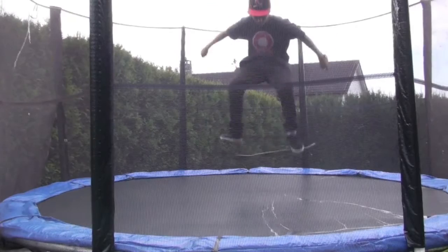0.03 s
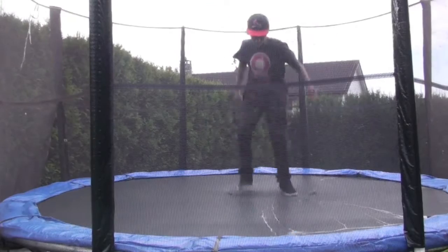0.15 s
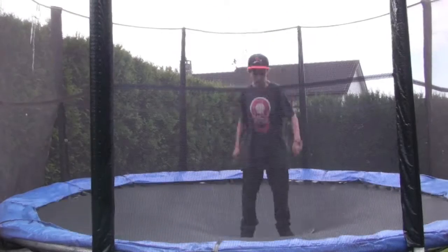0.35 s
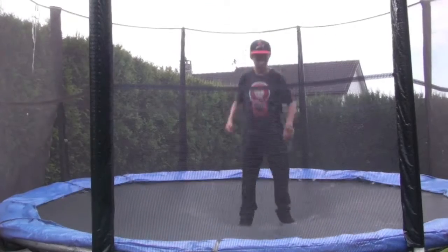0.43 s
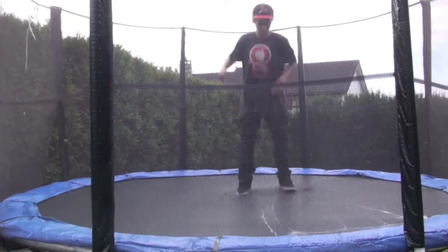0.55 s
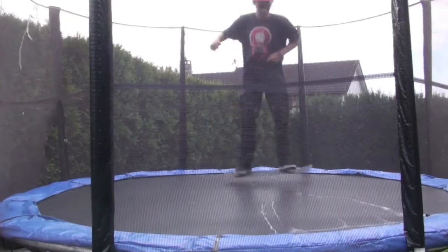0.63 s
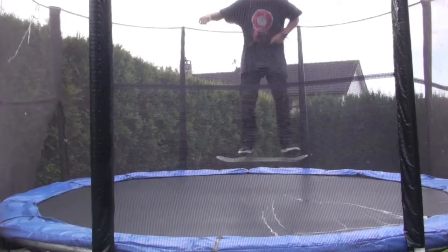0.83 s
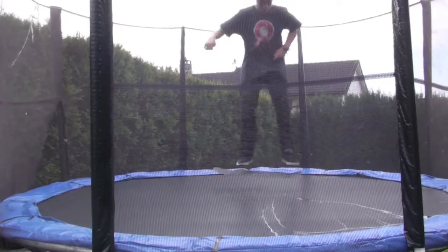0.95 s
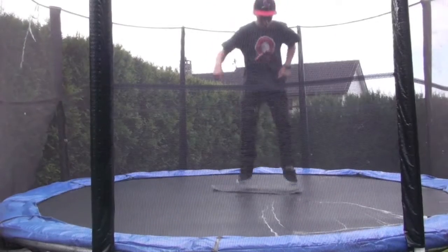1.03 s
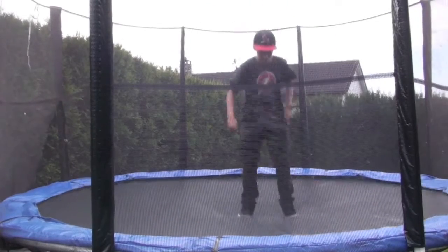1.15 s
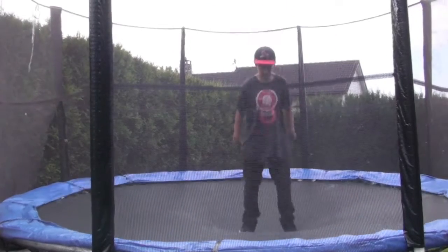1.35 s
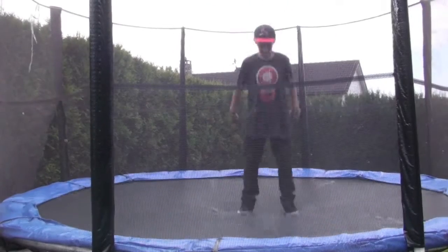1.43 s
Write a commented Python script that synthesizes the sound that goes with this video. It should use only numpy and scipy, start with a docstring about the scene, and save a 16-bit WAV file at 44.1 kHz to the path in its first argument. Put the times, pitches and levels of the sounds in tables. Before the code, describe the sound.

Two trampoline bounces with a skateboard deck underfoot. Shoes tap the board, then it lands with a scuff and clacks as the mat thumps and springs creak and ring. Fabric swishes before the second landing, close by in light wind.

```python
"""A rider bounces twice on a garden trampoline with a wheelless skateboard deck under the shoes.
Light wind runs throughout; at the start the springs creak and the mat thumps softly. At 0.24 s the feet
tap the deck in the air and it rings. At about 0.35 s the first landing scuffs, knocks and clacks, with a
short echo off hedge and house; the mat thumps, the springs creak and ring as they stretch, and the
fabric swishes on the rebound. The second landing comes at about 1.25 s."""
import sys
import numpy as np
from scipy import signal
from scipy.fft import rfft, irfft
from scipy.io import wavfile
from scipy.ndimage import uniform_filter1d

SR = 44100
rng = np.random.default_rng(int(sys.argv[2]) if len(sys.argv) > 2 else 0)


def wav_record(signal):
    """Record a signal, one row per channel, as 16-bit PCM in the file named by sys.argv[1]."""
    frames = np.transpose(np.atleast_2d(signal))
    bounded = np.clip(frames, -1, 1)
    # unit amplitude maps onto the largest positive 16-bit level
    quanta = np.round(bounded * 32767).astype(np.int16)
    wavfile.write(sys.argv[1], SR, quanta)


N = 66150
T = np.arange(N) / SR
BIN_HZ = np.arange(N // 2 + 1) * SR / N


def from_db(db):
    """Decibels to gain."""
    return 10 ** (np.asarray(db) / 20)


def rms_one(x):
    """Scale to rms 1."""
    return x / np.sqrt(np.mean(x ** 2) + 1e-20)


def per_bin(curve):
    """Spread a curve over the spectrum on a log-frequency axis."""
    hz, values = np.transpose(curve)
    return np.interp(np.log(BIN_HZ + 1), np.log(hz), values)


def filtered(x, hz, kind, order=2):
    """Causal Butterworth filter."""
    edges_hz = np.sort(np.clip(hz, 10, .45 * SR), axis=None).squeeze()
    return signal.sosfilt(signal.butter(order, edges_hz, kind, fs=SR, output="sos"), x + 1e-18)


def ring(start_s, hz, t60_s):
    """A struck sine that dies away."""
    age_s = np.maximum(T - start_s, 0)
    return np.sin(2 * np.pi * hz * age_s) * np.exp(-np.log(1000) * age_s / t60_s)


def envelope(start_s, attack_s, hold_s, t60_s):
    """Linear attack, hold, exponential release."""
    release_s = np.maximum(T - start_s - attack_s - hold_s, 0)
    return np.clip((T - start_s) / attack_s, 0, 1) * np.exp(-np.log(1000) * release_s / t60_s)


def white():
    """Two unrelated white noises."""
    return rng.standard_normal((2, N))


def grains(per_s, spread_db):
    """Two streams of random stick-slip clicks of uneven size."""
    sizes = from_db(spread_db * np.minimum(rng.exponential(1, (2, N)), 4))
    return (rng.random((2, N)) < per_s / SR) * sizes * rng.choice([-1, 1], (2, N))


def levelled(x, samples):
    """Ride the gain of a noise to hold it steady."""
    power = np.mean(np.atleast_2d(x) ** 2, axis=0)
    return x / np.sqrt(uniform_filter1d(power, samples) + 1e-12)


# Narrow image of close sounds: frequency_hz, left_right_correlation
CLOSE_IMAGE = [(40, 1), (200, 1), (500, 0.97), (1100, 0.72), (2200, 0.77), (4500, 0.94), (8000, 0.77),
               (13000, 0.96)]
def stereo(pair, eq, image=CLOSE_IMAGE):
    """EQ two unrelated signals and use them as mid and side; rms 1."""
    mid, side = rfft(pair) * from_db(per_bin(eq))
    alike = np.clip(per_bin(image), -1, 1)
    return rms_one(irfft(np.sqrt(1 + alike) * mid + np.sqrt(1 - alike) * side * [[1], [-1]], N))


# Full pan, added right and taken from left: frequency_hz, gain_db
PAN_CURVE = [(100, 0.9), (400, 1.14), (1150, 3), (2400, 1), (8000, 1.5), (13000, 2.5)]
SPRINGS_PAN = 0.28
def pan_right(x, amount=1):
    """Lean a source to the right, most in the midrange."""
    lean_db = amount * per_bin(PAN_CURVE)
    return irfft(rfft(x) * from_db(lean_db * np.array([[-1], [1]])), N)


# Bass-heavy air: frequency_hz, gain_db
WIND_EQ = [(25, -43), (60, -1.5), (110, -6.5), (250, -11), (600, -12), (1300, -15), (2500, -22),
           (6000, -26.5), (11000, -30.5), (16000, -36.5)]
# Its diffuse image: frequency_hz, left_right_correlation
WIND_IMAGE = [(80, 1), (400, 0.53), (2400, 0.11), (8000, 0.35), (13000, 0.98)]
def wind(level_db=-53.5, flutter_db=1.5):
    """A bed of light, slightly fluttering wind."""
    flutter = rms_one(filtered(rng.standard_normal(N), 5.9, "low"))
    return from_db(level_db + flutter_db * flutter) * stereo(white(), WIND_EQ, WIND_IMAGE)


# Creak fader, tracing the load on the springs: time_s, level_db
CREAK_FADER = [(0, -43), (.012, -46), (.04, -59), (.09, -72), (.23, -58), (.26, -47), (.32, -55),
               (.36, -31), (.41, -36), (.488, -43.5), (.497, -34.5), (.518, -37.5), (.545, -32.5),
               (.575, -35), (.595, -42), (.66, -49.5), (.74, -50), (.78, -47), (.82, -56), (.94, -53.5),
               (.98, -47.5), (1.005, -55.5), (1.08, -65.5), (1.21, -63.5), (1.27, -45.5), (1.305, -36),
               (1.34, -41), (1.39, -48), (1.412, -36.5), (1.44, -45), (1.47, -41.5), (1.5, -41.5)]
# Creak colour, with a soft top: frequency_hz, gain_db
CREAK_EQ = [(60, 2), (200, -1.5), (700, -0.5), (1300, -0.5), (2400, -1.5), (4000, -8.5), (7000, -14),
            (11000, -25), (16000, -38)]
def spring_creak():
    """Hooks stick and slip in their rings under load."""
    friction = levelled(stereo(grains(per_s=5000, spread_db=2.5), CREAK_EQ), samples=1200)
    level_db = np.interp(T, *np.transpose(CREAK_FADER))
    return pan_right(friction * from_db(level_db), SPRINGS_PAN)


# The mat takes a load: start_s, level_db, attack_s, t60_s, low_cut_hz, high_cut_hz
THUMP_CUES = [(.002, -39.5, 0.0031, 0.13, 89.5, 365), (.240, -43, 0.0037, 0.26, 71.5, 246),
              (0.322, -34.5, 0.002, 0.17, 60.5, 216), (0.351, -24.5, .002, 0.16, 90, 221),
              (0.373, -33, 0.0088, 0.44, 38, 148), (0.523, -34, 0.0121, 0.3, 85, 347),
              (0.599, -49.5, .02, .25, 35, 110), (0.951, -44, .016, 0.14, 85, 253),
              (1.224, -48, 0.0028, 0.25, 50, 310), (1.277, -37.5, 0.0072, 0.15, 116, 210),
              (1.405, -43.5, 0.0049, 0.13, 38.8, 128), (1.444, -43.5, 0.0053, 0.33, 56, 157)]
def mat_thumps(swing_gain=1.5, swing_t60_cycles=7.2):
    """The stretched mat answers each load with a damped swing and a rumble of crowded low modes."""
    out = np.zeros(N)
    for start_s, level_db, attack_s, t60_s, low_hz, high_hz in THUMP_CUES:
        rumble = filtered(rng.standard_normal(2 * N), [low_hz, high_hz], "band", order=3)[N:]
        rumble = levelled(rumble, samples=500) * envelope(start_s, attack_s, 0, t60_s)
        pitch_hz = np.sqrt(low_hz * high_hz)
        swing = ring(start_s + attack_s, pitch_hz, swing_t60_cycles / pitch_hz)
        out += from_db(level_db) * (rumble + swing_gain * filtered(swing, high_hz, "low", order=1))
    return pan_right(out, amount=0.46)


# Soles and deck scuff: start_s, level_db, attack_s, hold_s, t60_s, brightness_hz
SCUFF_CUES = [(0.236, -33.5, 0.00044, 0.0023, 0.12, 5150), (0.349, -26, 0.0022, 0.0053, 0.05, 4880),
              (0.357, -28, 0.00087, 0.017, 0.037, 8200), (0.38, -22, 0.00091, 0.01, 0.052, 3730),
              (0.953, -40.5, 0.013, 0.023, 0.045, 1610), (1.226, -45.5, 0.0017, 0.025, 0.055, 6030),
              (1.254, -25, 0.006, 0.026, .04, 3000), (1.274, -22, 0.0055, 0.0074, 0.067, 4480)]
# Grit colour: frequency_hz, gain_db
SCUFF_EQ = [(60, -30), (160, -5.5), (480, 1.5), (1250, -2.5), (2150, 1.5), (3300, -3.5), (6000, -4.5),
            (10000, -5.5)]
def scuffs():
    """Short gritty slides of sole on grip tape and deck on mat."""
    grit = levelled(stereo(grains(per_s=9000, spread_db=3.5), SCUFF_EQ), samples=250)
    out = np.zeros((2, N))
    for start_s, level_db, attack_s, hold_s, t60_s, brightness_hz in SCUFF_CUES:
        slide = grit * envelope(start_s, attack_s, hold_s, t60_s)
        out += from_db(level_db) * filtered(slide, brightness_hz, "low", order=3)
    return out


# Shoes hit the deck: start_s, level_db, low_cut_hz, brightness_hz, pitch_ratio, decay_ratio
KNOCK_CUES = [(0.2365, -23.5, 480, 5470, 1.0, 0.62), (0.2399, -22.5, 127, 2170, 1.06, 1.25),
              (0.3544, -8.7, 190, 640, .99, 1.24), (.3788, -17, 102, 2520, .98, 0.41),
              (1.2569, -11, 746, 1060, 1.044, 0.8), (1.2802, -20, 249, 2600, 0.95, 0.94),
              (1.285, -23, 203, 900, 1.15, 0.75)]
# The deck's resonances, before each hit scales them: pitch_hz, level_db, t60_s
DECK_MODES = [(133.6, -17, 0.17), (364, -3, 0.032), (481, -1.5, 0.05), (480, -17, 0.14), (614.5, -28, 0.35),
              (900, -5.5, 0.022), (1278, -6, 0.04), (1740, -3, 0.015), (1666, -21.5, 0.23),
              (2170, -19, 0.1), (2440, -14, 0.042), (2780, -5.5, 0.012), (4150, -4, 0.0086),
              (5120, -3.5, 0.012), (6560, -19, 0.02)]
def deck_knocks():
    """Each hit rings the deck's modes, retuned by the load and duller for a soft contact."""
    out = np.zeros(N)
    for start_s, level_db, low_hz, brightness_hz, pitch_ratio, decay_ratio in KNOCK_CUES:
        body = np.zeros(N)
        for k, (pitch_hz, mode_db, t60_s) in enumerate(DECK_MODES):
            gain = (-1) ** k * from_db(mode_db + rng.normal(0, 1))
            body += gain * ring(start_s, pitch_hz * pitch_ratio, t60_s * decay_ratio)
        body = filtered(body, brightness_hz, "low", order=3)
        out += from_db(level_db) * filtered(body, low_hz, "high")
    return out


# Hard edges hit: start_s, level_db, low_cut_hz, high_cut_hz
CLACK_CUES = [(0.238, -9, 3100, 6400), (0.242, -19, 810, 6230), (.3553, -0.5, 1470, 8300),
              (0.3714, 0, 1170, 7600), (.3792, 0.5, 900, 4030), (0.3957, 5.5, 1780, 3750),
              (1.276, -6.5, 2000, 6100), (1.2858, 11, 1990, 2400), (1.2968, 14, 1800, 3630)]
def edge_clacks(tail_db=-30, tail_t60_s=0.02):
    """Hard edges strike with a sharp click and a brief splintery tail."""
    out = np.zeros(N)
    for start_s, level_db, low_hz, high_hz in CLACK_CUES:
        click = signal.unit_impulse(N, int(start_s * SR))
        tail = from_db(tail_db) * rng.standard_normal(N) * envelope(start_s, 1 / SR, 0, tail_t60_s)
        out += from_db(level_db) * filtered(click + tail, [low_hz, high_hz], "band", order=4)
    return out


def garden_echo(x, level_db=-26, predelay_s=0.012, t60_s=0.49, band_hz=(94, 3200)):
    """Dull scattered reflections off hedge and house, different at each ear."""
    tail = filtered(white(), band_hz, "band") * envelope(predelay_s, 0.0059, 0, t60_s)
    return from_db(level_db) * signal.fftconvolve(x, rms_one(tail) / np.sqrt(N), axes=1)[:, :N]


# Fabric moves: start_s, level_db, attack_s, t60_s
SWISH_CUES = [(0.322, -38, 0.0025, 0.018), (.332, -44.5, 0.011, 0.12), (0.402, -37.5, 0.015, 0.39),
              (.455, -43, 0.0084, 0.073), (0.493, -38.5, 0.0089, 0.22), (.60, -55.5, 0.078, 0.7),
              (0.743, -45.5, 0.048, 0.12), (0.83, -40, 0.0067, 0.16), (0.891, -37, 0.0062, 0.14),
              (1.22, -52, .003, 1), (1.396, -52.5, 0.0045, 0.099)]
# Airy cloth colour: frequency_hz, gain_db
SWISH_EQ = [(300, -28), (1200, -7.5), (2500, 6.5), (3700, 3), (5500, 6), (8400, 4), (10300, -2.5),
            (12400, -1), (13800, -13), (16000, -8.5)]
def fabric_swishes():
    """Woven mat and net rub in soft bright swishes."""
    fader = sum(from_db(level_db) * envelope(start_s, attack_s, 0, t60_s)
                for start_s, level_db, attack_s, t60_s in SWISH_CUES)
    return stereo(white(), SWISH_EQ) * fader


# Jolts to springs and frame: start_s, level_db, centre_hz, spread_octaves
JOLT_CUES = [(0.357, -44, 1980, 0.21), (.493, -31, 1650, 0.15), (1.282, -30, 2130, 0.47),
             (1.36, -47.5, 2340, .38), (1.403, -39, 1083, 0.45)]
# Their steel resonances: pitch_hz, level_db, t60_s
STEEL_MODES = [(512, 11, 1), (862, 1, 0.44), (1323, 10, 0.16), (1660, 5.5, 0.23), (2000, 6, 0.14),
               (2098, 17, 0.089), (2450, -9, 0.47), (2910, -2, 0.32), (3560, 8, 0.14)]
def spring_ring(springs_per_jolt=3, detune=0.0066, attack_s=0.0046, scatter_db=4.2):
    """Each jolt sets a few springs ringing, no two tuned quite alike."""
    out = np.zeros((2, N))
    for start_s, level_db, centre_hz, spread_octaves in JOLT_CUES:
        fade_in = np.clip((T - start_s) / attack_s, 0, 1)
        for pitch_hz, mode_db, t60_s in STEEL_MODES:
            excitation = np.exp(-.5 * (np.log2(pitch_hz / centre_hz) / spread_octaves) ** 2)
            springs = [rng.choice([-1, 1]) * ring(start_s, pitch_hz * rng.normal(1, detune), t60_s)
                       for _ in range(springs_per_jolt)]
            ear_gains = from_db(level_db + mode_db + rng.normal(0, scatter_db, (2, 1)))
            out += excitation * ear_gains * np.mean(springs, axis=0) * fade_in
    return pan_right(out, SPRINGS_PAN)


def scene():
    """The deck and its echo, mixed over mat, springs, fabric and wind."""
    deck = pan_right(deck_knocks() + edge_clacks() + scuffs())
    return (deck + garden_echo(deck) + mat_thumps()
            + spring_creak() + spring_ring() + fabric_swishes() + wind())


def record(dry):
    """A steep high cut at 16 kHz on the mix."""
    return signal.sosfilt(signal.ellip(10, .1, 80, 16000, fs=SR, output="sos"), dry)


dry = scene()
out = record(dry)
wav_record(out)
```